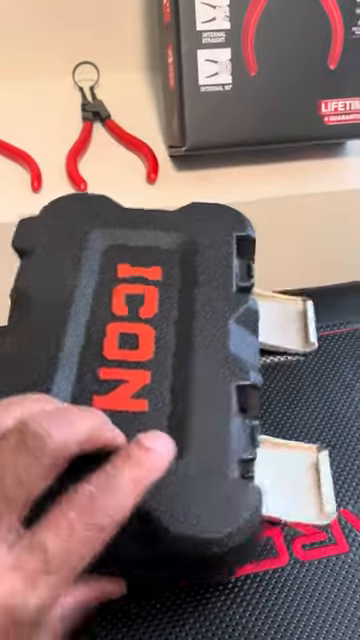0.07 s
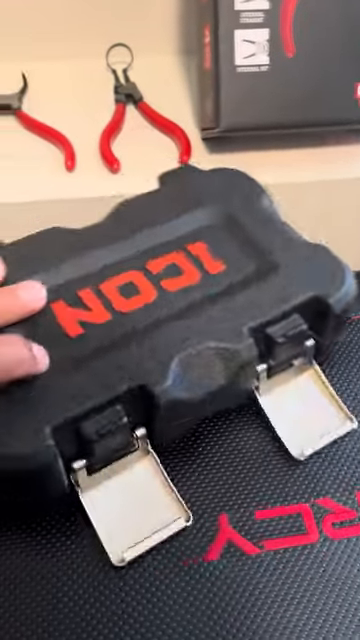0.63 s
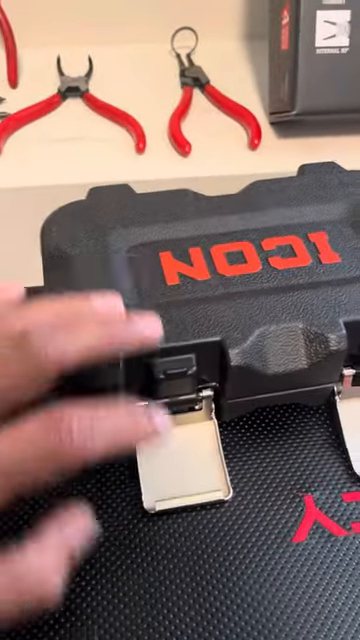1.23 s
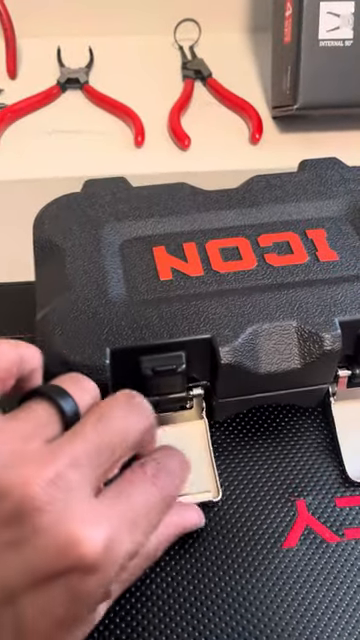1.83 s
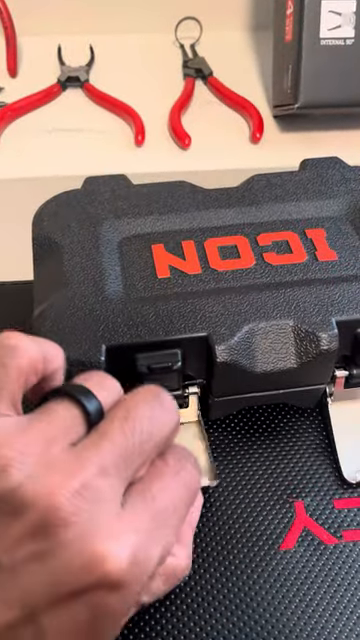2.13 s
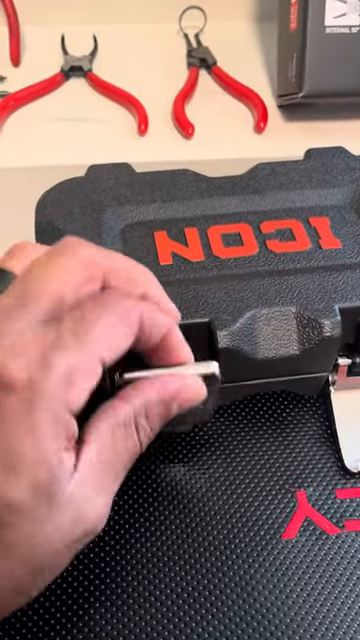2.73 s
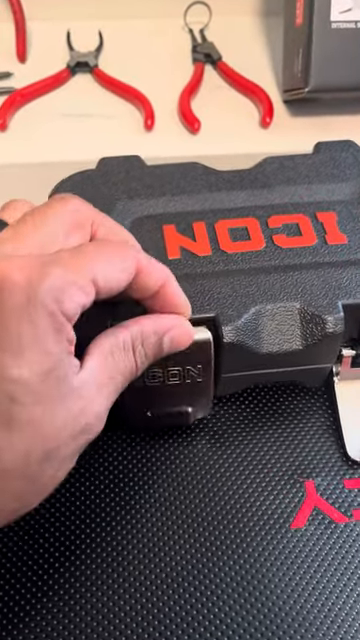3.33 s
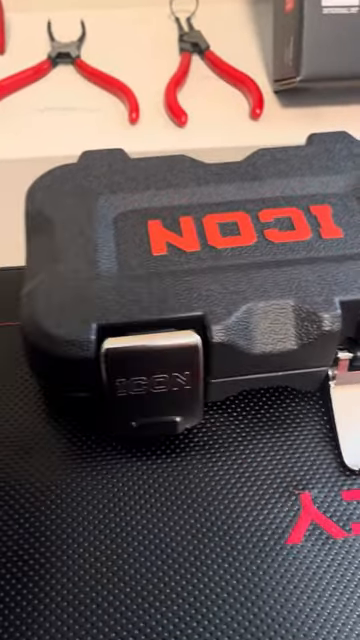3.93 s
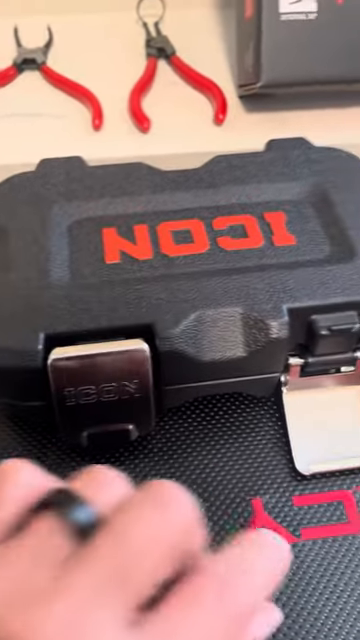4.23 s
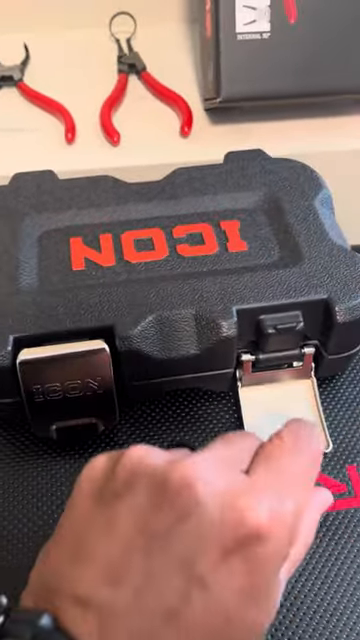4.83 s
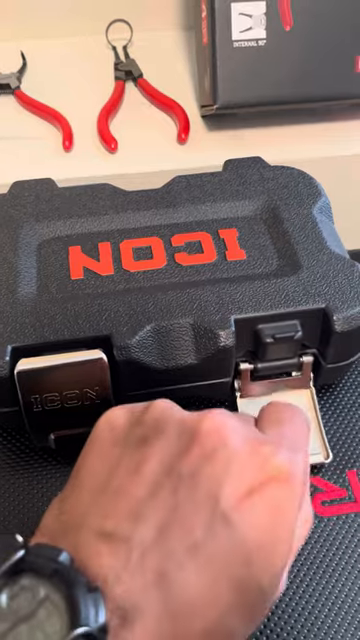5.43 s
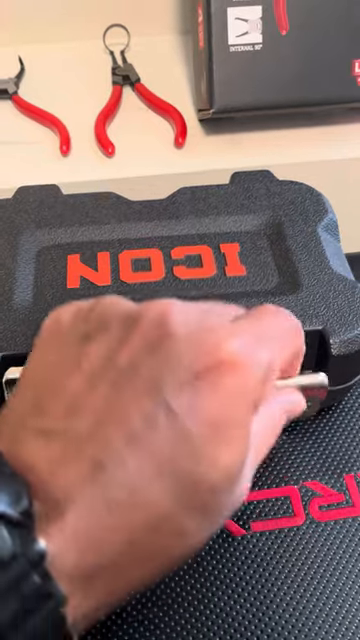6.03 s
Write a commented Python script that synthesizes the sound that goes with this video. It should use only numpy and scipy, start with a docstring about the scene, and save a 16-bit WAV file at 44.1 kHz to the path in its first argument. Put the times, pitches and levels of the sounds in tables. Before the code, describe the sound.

A hollow plastic tool case scrapes briefly over a desk mat and bumps down at about 0.2 seconds with a low boom and a rattle of loose steel latches. Soft rubbing follows, with a light knock near 0.9 seconds. Around 1.8 seconds a latch clinks several times, then small clicks and tiny finger creaks continue as it is hooked. At about 3.1 seconds it shuts with a sharp, briefly ringing snap, the loudest sound. Several hollow knocks and thuds follow until 3.6 seconds. After a lull, soft dull taps come between 4.4 and 4.9 seconds, and a second latch clicks and clinks lightly from 5 seconds to the end at about 6, with faint rubbing. Everything is close, in a small room with a short echo. Far outside, a very faint engine idles as a low hum, swelling as it pulls away from about 5.3 seconds.

```python
"""A hollow plastic tool case scrapes round on a desk mat, bumps down, and its two steel latches rattle.
Fingers lift one latch, hook its wire loop, snap it shut and start on the second. Each contact rings
box, shell, wire and lever in its own proportions; rubs and creaks are runs of tiny slips.
Heard close up on a pair of microphones in a small room. Far outside, beyond the walls,
an engine idles throughout and pulls away near the end."""
import sys
import numpy as np
from scipy import signal
from scipy.fft import rfft, irfft, next_fast_len
from scipy.io import wavfile

SR = 44100
rng = np.random.default_rng(int(sys.argv[2]) if len(sys.argv) > 2 else 0)


def store_wav(level_fs):
    """Save 16-bit WAV to argv[1]."""
    pcm = np.round(np.clip(np.atleast_2d(level_fs), -1, 1) * 32767)
    wavfile.write(sys.argv[1], SR, pcm.T.astype(np.int16))


N = 268216
TIME = np.arange(N) / SR
BLOW_TIME = TIME[:SR // 9]


def from_db(db):
    """Decibels to gain."""
    return 10 ** (np.asarray(db) / 20)


def unit_rms(x):
    """Scale to rms 1."""
    return x / np.sqrt(np.mean(x ** 2) + 1e-20)


def unit_attack(x):
    """Scale so that the first 8 ms have rms 1."""
    return x / np.sqrt(np.mean(x[:int(.008 * SR)] ** 2))


def in_time(rows):
    """The columns of a curve at every sample."""
    times, *columns = np.transpose(rows)
    return [np.interp(TIME, times, column) for column in columns]


def at_hz(points, hz):
    """Read a spectrum on a log-frequency axis."""
    freqs, levels = np.transpose(points)
    return np.interp(np.log(hz + 1), np.log(freqs), levels)


def coloured(x, spectrum):
    """Filter by a spectrum that falls 10 dB per octave beyond its ends."""
    size = next_fast_len(len(x), True)
    hz = np.fft.rfftfreq(size, 1 / SR)
    octaves_outside = np.abs(np.log2((hz + 1) / np.clip(hz + 1, spectrum[0][0], spectrum[-1][0])))
    gain = from_db(at_hz(spectrum, hz) - 10 * octaves_outside)
    return irfft(rfft(x, size) * gain, size)[:len(x)]


def tilted(rows, db_per_octave):
    """Brighten or dull a table of modes or a spectrum."""
    return [(hz, db + db_per_octave * np.log2(hz / rows[0][0]), *rest) for hz, db, *rest in rows]


def noise(spectrum, size):
    """Noise of the given colour, rms 1."""
    return unit_rms(coloured(rng.standard_normal(size), spectrum))


def drift(per_s):
    """A random wander, spread about 1."""
    return np.interp(TIME * per_s, np.arange(4096), rng.standard_normal(4096))


def add(track, start_s, sound):
    """Mix a sound in at a time."""
    i = max(0, int(start_s * SR))
    track[i:i + len(sound)] += sound[:max(0, N - i)]


def struck(modes, crack, crack_t60, ring_db, rise_s, spread_db):
    """One blow: a crack of dense, damped modes, and ringing modes whose strengths depend on the spot hit."""
    t = BLOW_TIME
    hz, db, t60 = np.transpose(modes)[:, :, None]
    strength, detune, phase = rng.standard_normal((3, len(modes), 1))
    envelopes = from_db(db + spread_db * strength - 60 * t / t60)
    ring = (envelopes * np.sin(2 * np.pi * (hz * (1 + .003 * detune) * t + phase))).sum(0)
    colour = [(freq, level + spread_db * rng.standard_normal()) for freq, level in crack]
    burst = noise(colour, len(t)) * from_db(-60 * t / crack_t60)
    blow = unit_attack(burst) + from_db(ring_db) * unit_attack(ring)
    return unit_attack(blow * (1 - np.exp(-t / rise_s)))


def ticking(force, per_s, modes, crack):
    """Light touches on one part at random moments, scaled by the force at that moment."""
    tick = struck(modes, crack, crack_t60=0.008, ring_db=-6, rise_s=0.00027, spread_db=1)
    touches = (rng.random(N) < per_s / SR) * rng.uniform(-1, 1, N)
    return signal.oaconvolve(touches * force, tick)[:N]


# The engine far outside, as heard indoors: time_s, firing_hz, level_db
ENGINE_RUN = [(0, 113.4, -61), (3.9, 115.3, -58.5), (4.6, 111.5, -69.5), (5.35, 99.03, -49),
              (5.5, 95.56, -47), (5.66, 97.85, -41), (5.8, 105, -48),  (6.08, 114.4, -49.5)]
# Its orders: firing_multiple, idle_db, full_load_db
ENGINE_ORDERS = [(0.499, -6.5, -28.5), (1, 1.5, 1.5), (2.001, -9.5, -8.5)]

def distant_engine():
    """Only the lowest orders pass the walls; under load the firing tone takes over."""
    firing_hz, level_db = in_time(ENGINE_RUN)
    firings = np.cumsum(firing_hz * (1 + .006 * drift(12))) / SR
    load, = in_time([(5.2, 0), (5.6, 0.48)])
    out = np.zeros(N)
    for multiple, idle_db, full_load_db in ENGINE_ORDERS:
        order_db = level_db + idle_db + load * (full_load_db - idle_db) + 0.67 * drift(3.2)
        out += from_db(order_db) * np.sin(2 * np.pi * (multiple * firings + rng.random()))
    return out


# The still room around the microphones: freq_hz, density_db
AIR_SPECTRUM = [(20, -23.5), (50, -8.5), (80, -2), (130, -2.5), (300, -23), (1000, -44), (16000, -54.5)]

def room_tone(level_db):
    """A steady low rumble with a faint hiss."""
    return from_db(level_db) * noise(AIR_SPECTRUM, N)


# Case over mat and fingers over case, close by: start_s, length_s, rub_db, scratch_vs_rub_db
HAND_STROKES = [(0.086, 0.24, -45.5, -4), (0.406, 0.628, -57, -3), (0.907, 0.049, -53.5, -2.5),
                (1.23, 0.74, -71, -4), (1.904, 0.92, -56.5, -6), (3.005, 0.53, -54, -9),
                (4.836, 0.26, -56.5, -15), (5.24, 0.5, -57.5, -6.5), (5.863, 0.26, -55.5, -16.5)]
SWELL_DB_PER_S, SAG_DB_PER_S, STOP_DB_PER_S = 226, 5.5, 257.5

def stroke_gains():
    """Rub and scratch gains: a stroke swells, sags as the hand slows, and stops; the strongest leads."""
    rub, scratch = np.zeros((2, N))
    for start_s, length_s, rub_db, scratch_db in HAND_STROKES:
        t = TIME - start_s
        swell_db = SWELL_DB_PER_S * np.minimum(t, 0)
        sag_db = SAG_DB_PER_S * np.clip(t, 0, length_s)
        stop_db = STOP_DB_PER_S * np.maximum(t - length_s, 0)
        gain = from_db(rub_db + swell_db - sag_db - stop_db)
        rub = np.maximum(rub, gain)
        scratch = np.maximum(scratch, gain * from_db(scratch_db))
    return rub, scratch


def friction(spectrum, slips_per_s, spread_db, waver_db):
    """Many tiny slips of uneven size under a wavering pressure."""
    slips = (rng.random(N) < slips_per_s / SR) * rng.standard_normal(N)
    slips *= from_db(spread_db * rng.standard_normal(N))
    return unit_rms(coloured(slips, spectrum) * from_db(waver_db * drift(70)))


# The low rub and the fine scratch of plastic: freq_hz, density_db
RUB_SPECTRUM = [(130, -4.5), (280, -1.5), (480, 0.5), (850, -8.5), (1700, -15.5), (4500, -34.5)]
SCRATCH_SPECTRUM = [(900, -7), (3400, -6.5), (6500, -13.5), (12000, -16), (16000, -23)]

def sliding():
    """Grained plastic rubs on the mat and under the fingers, with grit and small rattles on top."""
    rub_gain, scratch_gain = stroke_gains()
    rub = rub_gain * friction(RUB_SPECTRUM, slips_per_s=1800, spread_db=3, waver_db=2.5)
    scratch = scratch_gain * friction(SCRATCH_SPECTRUM, slips_per_s=5000, spread_db=2.5, waver_db=1.5)
    return rub + scratch + grit(rub_gain) + hinge_rattles(scratch_gain)


# Modes of the plastic shell: pitch_hz, level_db, t60_s
SHELL_MODES = [(630.5, 0, 0.03), (901.5, -1, 0.062), (1091, -1, 0.04), (1355, 0, 0.05), (1580, -7, 0.035),
               (2135, -1.5, 0.035), (2410, -1, 0.03)]
# Its crack: freq_hz, density_db
SHELL_SPECTRUM = [(350, -21.5), (620, 0), (1050, 2.5), (1800, -8.5), (2500, -3), (3800, -20)]

def grit(force, grains_per_s=200):
    """Grains under the sliding case tick dully on the shell."""
    return from_db(-5.5) * ticking(force, grains_per_s, tilted(SHELL_MODES, -4), tilted(SHELL_SPECTRUM, -4))


# Modes of the second latch's wire loop: pitch_hz, level_db, t60_s
SECOND_LOOP_MODES = [(3555, -5, 0.007), (3980, 4.5, 0.014), (5210, 2, 0.015)]
# The crack of either loop: freq_hz, density_db
LOOP_SPECTRUM = [(2400, -16), (3200, 2.5), (3950, -4.5), (5600, -4), (7500, -24.5)]

def hinge_rattles(force, per_s=14):
    """Play in the hinges lets loose parts tick against shell and wire while the hand moves."""
    shell = from_db(7.5) * ticking(force, per_s, SHELL_MODES, SHELL_SPECTRUM)
    wire = from_db(1.5) * ticking(force, per_s, SECOND_LOOP_MODES, LOOP_SPECTRUM)
    return shell + wire


# Contacts at the desk, close to the microphones: start_s, level_db, brightness_db
PLASTIC_TAPS = [(0.1955, -39, 8), (0.9268, -38, -7.5), (0.948, -38, -3.5), (1.2, -48.5, -1),
                (1.4624, -49, 2), (2.333, -50, 10), (4.39, -54.5, -2), (4.5204, -54, 3.5),
                (4.8921, -40.5, -15), (4.932, -39.5, -12), (6.033, -46, 14)]  # fingers and mat, dull on the plastic
LATCH_CLINKS = [(0.2073, -24.5, 1.5), (0.2215, -33.5, 8.5), (0.264, -40, 2), (0.2733, -36.5, 2),
                (0.3153, -37, 0.5), (0.3687, -37, -5), (0.434, -44, -0.5), (0.4989, -39.5, -4),
                (0.91, -39.5, -2), (1.2, -72, 21.5), (1.6615, -43.5, -11), (1.7635, -37, -9),
                (1.7695, -21.5, -5), (1.796, -32, -8), (1.8381, -22, -6.5), (1.8496, -23.5, -0.5),
                (1.903, -33.5, -5), (1.9125, -39, -12), (2.1205, -30, 1.5), (5.2434, -43, -3),
                (5.338, -34, -7.5), (5.6657, -33.5, 4)]  # a loose latch swings against its own loop
CATCH_CLICKS = [(1.7752, -34, 12.5), (2.004, -45.5, -2), (2.2275, -43, 6), (2.2321, -36, -7),
                (2.2374, -30, 1.5), (2.257, -43.5, 4), (2.385, -49, 2.5), (2.445, -52, 3.5),
                (2.452, -42, -1.5), (2.486, -38, 9), (2.492, -40, -1.5), (2.5559, -45, 2), (2.588, -39, -1),
                (2.677, -48, -0.5), (2.6983, -36.5, 5), (2.7913, -47, 0.5), (2.9314, -38, 0.5),
                (3.0596, -37.5, 1), (3.344, -46, 3), (5.04, -40, 0.5), (5.2017, -52.5, -8),
                (5.2864, -37.5, -1.5), (5.3727, -46.5, 2), (5.4419, -45, -8), (5.5583, -42, -5.5),
                (5.9401, -44.5, -2.5), (5.9525, -43.5, -1.5), (6.0064, -38.5, 3)]  # steel on the plastic catch as a latch is lifted and hooked
CASE_KNOCKS = [(0.1975, -32, -6.5), (3.118, -35, 2.5), (3.1618, -27.5, 1.5), (3.3538, -35.5, 2),
               (3.4569, -35.5, -0.5), (3.4626, -33.5, 1.5), (3.5893, -33, 8), (3.6052, -38, -1),
               (3.617, -41, 1.5), (3.6224, -32.5, -1)]  # a latch is jolted or pressed home and the whole case knocks
# The snap: lever flips onto shell, lid is pulled down, lever rebounds.
# delay_s, box_db, shell_db, loop_db, lever_db
SNAP_BLOWS = [(0, -28.5, 0.5, -1.5, -12.5), (.003, -5, -14.5, -15.5, -23.5),
              (0.0097, -28.5, -17.5, -17.5, -11)]
FIRST_FROM_S, FIRST_TO_S = 1.1, 4.1  # the first latch sounds in this span, the second outside it
HOOKED_S, SNAP_S, LOCKED_S, LET_GO_S = 2.2, 3.0749, 3.1, 3.55  # steps in closing the first latch
SNAP_DB = -16

def contacts():
    """Each contact shares its force among the parts: start_s, box_db, shell_db, loop_db, lever_db."""
    # contacts, each part's share_db, each part's gain in dB per dB of brightness
    kinds = [(PLASTIC_TAPS, (-1, -4, -26, -21.5), (0.033, 0.87, 2, 0.68)),
             (LATCH_CLINKS, (-18.5, -11, -1.5, -6.5), (0.2, 0.12, 0.019, 1)),
             (CATCH_CLICKS, (-10, 0, 1, -5.5), (-0.16, -0.53, -0.59, 0.97)),
             (CASE_KNOCKS, (-7.5, -4, 0, -2.5), (0.087, -0.68, 0.43, 0.94))]
    for rows, share_db, shift in kinds:
        for start_s, level_db, brightness_db in rows:
            parts_db = level_db + np.array(share_db) + brightness_db * np.array(shift)
            yield (start_s, *parts_db)
    for delay_s, *share_db in SNAP_BLOWS:
        yield (SNAP_S + delay_s, *(SNAP_DB + np.array(share_db)))


# Modes of the hollow box, unlatched and clamped shut: pitch_hz, level_db, t60_s
LOOSE_BOX_MODES = [(416.4, 1, .055), (480.7, 2.5, 0.06), (621, -8, 0.027)]
SHUT_BOX_MODES = [(223, -9, 0.23), (345.6, 2.5, 0.035), (422, 0.5, 0.03)]
# Its crack: freq_hz, density_db
BOX_SPECTRUM = [(140, -30.5), (260, -20), (450, -2), (900, -26)]

def hollow_box(start_s):
    """The box and its air swell slowly; once clamped, the halves ring lower, as one body."""
    modes = SHUT_BOX_MODES if start_s > LOCKED_S else LOOSE_BOX_MODES
    return struck(modes, BOX_SPECTRUM, crack_t60=0.036, ring_db=-4.5, rise_s=0.0024, spread_db=2)


def plastic_shell(shell_db, loop_db):
    """Steel and force make a bright contact on the shell; a fingertip makes a dull one."""
    hardness = np.clip(0.12 * (loop_db - shell_db) + 0.23 * max(shell_db + 30.5, 0), -4, 4)
    return struck(tilted(SHELL_MODES, hardness), tilted(SHELL_SPECTRUM, hardness),
                  crack_t60=0.017, ring_db=-9, rise_s=0.00022, spread_db=4.5)


# Modes of the first latch's wire loop, free and under tension: pitch_hz, level_db, t60_s
FREE_LOOP_MODES = [(3444, 2, 0.02), (3705, 8, 0.016), (3920, 1, 0.012)]
TAUT_LOOP_MODES = [(3040, -2.5, 0.01), (3840, 2.5, 0.008), (5234, 3, 0.022)]

def wire_loop(start_s):
    """Each latch has its own wire; the first rings freely until it is hooked and tension deadens it."""
    if not FIRST_FROM_S < start_s < FIRST_TO_S:
        modes, ring_db = SECOND_LOOP_MODES, -2.5
    elif start_s > HOOKED_S:
        modes, ring_db = TAUT_LOOP_MODES, -4
    else:
        modes, ring_db = FREE_LOOP_MODES, 3.5
    return struck(modes, LOOP_SPECTRUM, crack_t60=0.011, ring_db=ring_db, rise_s=0.00023, spread_db=3)


# Modes of the lever, loose, pinched, and locked down and let go: pitch_hz, level_db, t60_s
LOOSE_LEVER_MODES = [(7360, -4.5, 0.028), (8820, 2.5, 0.033), (11760, -3.5, 0.025), (12200, -0.5, 0.025)]
HELD_LEVER_MODES = [(7540, 0.5, 0.014), (8470, 4.5, 0.018), (12470, 0, 0.035)]
SHUT_LEVER_MODES = [(7440, -3.5, 0.048), (8860, 7.5, 0.054), (11640, -3, 0.04)]
# Its crack: freq_hz, density_db
LEVER_SPECTRUM = [(4500, -18.5), (6500, -2.5), (8700, 3.5), (12300, -3), (16000, -8)]

def steel_lever(start_s, lever_db):
    """Fingers choke the lever while they hold it; a firm blow brings out its ring and its highest modes."""
    if LET_GO_S < start_s < FIRST_TO_S:
        modes, ring_db = SHUT_LEVER_MODES, 1
    elif start_s > HOOKED_S:
        modes, ring_db = HELD_LEVER_MODES, -5
    else:
        modes, ring_db = LOOSE_LEVER_MODES, -1.5
    sheen = np.clip(.45 * (lever_db + 41), -6, 3)
    return struck(tilted(modes, sheen), tilted(LEVER_SPECTRUM, sheen),
                  crack_t60=0.015, ring_db=ring_db + .5 * min(sheen, 0), rise_s=0.00049, spread_db=3.5)


def chatter(sound, lead_s, level_db=-7.5, before_s=.0026, after_s=.007, per_s=900):
    """Parts scuff just before they meet and bounce just after; the main touch comes lead_s in."""
    lead = int(lead_s * SR)
    t = np.arange(-lead, 2 * lead) / SR
    touches = (rng.random(len(t)) < per_s / SR) * rng.standard_normal(len(t))
    touches *= np.exp(np.minimum(t / before_s, -t / after_s))
    touches *= from_db(level_db) / np.sqrt(np.sum(touches ** 2) + 1e-12)
    touches[lead] = 1
    return signal.fftconvolve(sound, touches)


def case_and_latches(lead_s=.015):
    """Every contact gives a chattering click of shell and steel over the slower knock of the box."""
    out = np.zeros(N)
    for start_s, box_db, shell_db, loop_db, lever_db in contacts():
        add(out, start_s, from_db(box_db) * hollow_box(start_s))
        click = from_db(shell_db) * plastic_shell(shell_db, loop_db)
        click += from_db(loop_db) * wire_loop(start_s)
        click += from_db(lever_db) * steel_lever(start_s, lever_db)
        add(out, start_s - lead_s, chatter(click, lead_s))
    return out


# The case drops on the desk: start_s, level_db
DESK_BUMPS = [(0.197, -29.5), (0.2224, -33)]
# Modes of the desk top: pitch_hz, level_db, t60_s
DESK_MODES = [(84, 4.5, 0.49), (128, 6.5, 0.22), (157.3, 2, 0.26)]

def desk_boom():
    """The desk top booms under the falling case; it radiates little of the deepest bass."""
    out, t = np.zeros(N), TIME[:SR]
    boom = sum(from_db(db - 60 * t / t60) * np.sin(2 * np.pi * hz * t) for hz, db, t60 in DESK_MODES)
    for start_s, level_db in DESK_BUMPS:
        add(out, start_s, from_db(level_db) * boom)
    return signal.sosfilt(signal.butter(4, 55, "high", fs=SR, output="sos"), out + 1e-18)


# Fingertips drag over the grained plastic and the latch: start_s, length_s, level_db, pitch_hz
FINGER_CREAKS = [(1.49, .12, -61.5, 599), (2.456, .025, -42.5, 559.1), (2.549, .018, -43.5, 652),
                 (2.59, .03, -48.5, 777), (4.806, .075, -66, 743)]

def finger_creaks(slips_per_s=140, t60_s=0.035, spread_octaves=0.13):
    """Skin catches and lets go at uneven intervals; each slip rings the plastic at a pitch of its own."""
    out = np.zeros(N)
    for start_s, length_s, level_db, pitch_hz in FINGER_CREAKS:
        gaps = rng.uniform(.3, 1.7, 40) / slips_per_s
        delays = np.cumsum(gaps) - gaps[0]
        crack = [(pitch_hz / 2, -6), (pitch_hz, 0), (4000, -28)]
        for delay_s, (size, detune) in zip(delays, rng.standard_normal((len(gaps), 2))):
            mode = (pitch_hz * 2 ** (spread_octaves * detune), 0, t60_s)
            slip = struck([mode], crack, crack_t60=t60_s, ring_db=5.5, rise_s=0.0014, spread_db=2)
            if delay_s < length_s:
                add(out, start_s + delay_s, from_db(level_db + 2 * size) * slip)
    return out


# Modes of the sprung steel after the snap: pitch_hz, level_db, t60_s
SPRUNG_STEEL_MODES = [(3182, -34.5, 0.11), (5240, -26, .09), (8296, -27, .11)]

def snap_tail(shudders_per_s=330, shudder_db=-28, shudder_t60_s=0.18):
    """After the snap the sprung steel sings on and the lid shudders against the box."""
    t = np.maximum(TIME - SNAP_S, 0)
    ring = sum(from_db(db - 60 * t / t60) * np.sin(2 * np.pi * hz * t)
               for hz, db, t60 in SPRUNG_STEEL_MODES)
    force = (TIME > SNAP_S) * from_db(shudder_db - 60 * t / shudder_t60_s)
    return ring + ticking(force, shudders_per_s, SHELL_MODES, SHELL_SPECTRUM)


# The shut case is pushed against the mat: start_s, level_db, start_pitch_hz
MAT_THUDS = [(3.162, -23, 400.4), (3.357, -31.5, 307.3), (3.4634, -24, 393)]

def mat_thuds(rise_s=0.0025, t60_s=0.036, sag_octaves_per_s=22):
    """The shut case thumps on the soft mat; its hollow note sinks as the push lets off."""
    out, t = np.zeros(N), BLOW_TIME
    for start_s, level_db, pitch_hz in MAT_THUDS:
        cycles = np.cumsum(pitch_hz * 2 ** (-sag_octaves_per_s * t)) / SR
        envelope = from_db(level_db - 60 * t / t60_s) * (1 - np.exp(-t / rise_s))
        add(out, start_s, envelope * np.sin(2 * np.pi * cycles))
    return out


# Colour of the small room's echo: freq_hz, gain_db
ECHO_SPECTRUM = [(100, -6.5), (400, -2.5), (8000, -4.5), (16000, -17)]

def room_echo(x, tail_t60, wet_db, early_db, early_t60):
    """Quick reflections from the nearby desk and shelf, then the tail of the room."""
    t = TIME[:SR]
    envelope = from_db(-60 * t / tail_t60) + from_db(early_db - 60 * t / early_t60)
    envelope *= np.clip(t / 0.003 - 1, 0, 1)  # nothing returns in the first 3 ms
    echo = envelope * rng.standard_normal(SR) / np.sqrt(np.sum(envelope ** 2))
    return from_db(wet_db) * signal.fftconvolve(x, coloured(echo, ECHO_SPECTRUM))[:N]


# The left microphone against the right: freq_hz, lead_rad
LEFT_PHASE_LEAD = [(0, 0), (1810, 0.5), (2780, 2.5), (4000, 0.94), (4910, 1), (7600, 6.5), (11000, 10),
                   (13300, 14), (14000, 10)]
# And in level: freq_hz, left_minus_right_db
LEFT_LEVEL_LEAD = [(100, -0.5), (280, -3.5), (900, 2), (3000, -1.5), (8000, 0)]

def microphones(x):
    """The two channels hear the same sound, with a phase and level difference that wander up and down with
    frequency."""
    size = next_fast_len(N + SR)
    hz = np.fft.rfftfreq(size, 1 / SR)
    sides = np.array([[.5], [-.5]])
    phase = sides * np.interp(hz, *np.transpose(LEFT_PHASE_LEAD))
    gain = from_db(sides * at_hz(LEFT_LEVEL_LEAD, hz))
    return irfft(rfft(x, size) * gain * np.exp(1j * phase), size)[:, :N]


def scene():
    """The case close up, the engine far behind; part of the echo differs between the microphones."""
    close = case_and_latches() + snap_tail() + desk_boom() + mat_thuds() + sliding() + finger_creaks()
    shared_echo = room_echo(close, tail_t60=0.44, wet_db=-6.5, early_db=-2.5, early_t60=0.13)
    side_echo = room_echo(close, tail_t60=0.45, wet_db=-8.5, early_db=13, early_t60=0.05)
    background = distant_engine() + room_tone(-60.5)
    bass_cut = signal.butter(1, 300, "high", fs=SR, output="sos")  # bass reaches both microphones alike
    side = signal.sosfilt(bass_cut, side_echo) + room_tone(-79)
    return microphones(close + shared_echo + background) + side * [[1], [-1]]


def record(dry, ceiling=0.8, cutoff_hz=16200):
    """The highest peaks are rounded and the top is cut steeply."""
    rounded = ceiling * np.tanh(dry / ceiling)
    return signal.sosfilt(signal.ellip(10, .2, 80, cutoff_hz, fs=SR, output="sos"), rounded)


dry = scene()
out = record(dry)
store_wav(out)
```